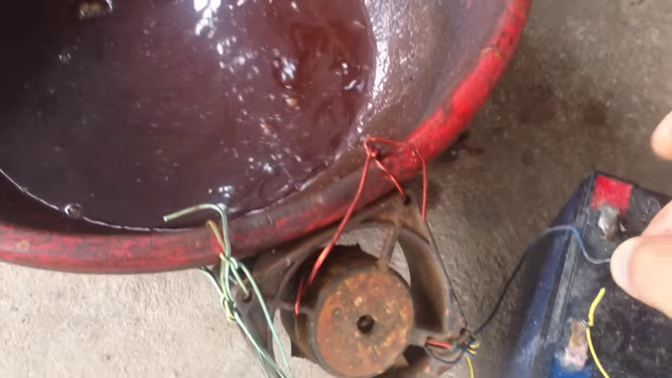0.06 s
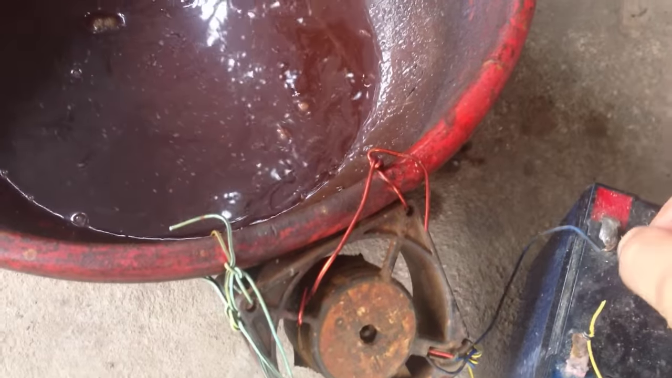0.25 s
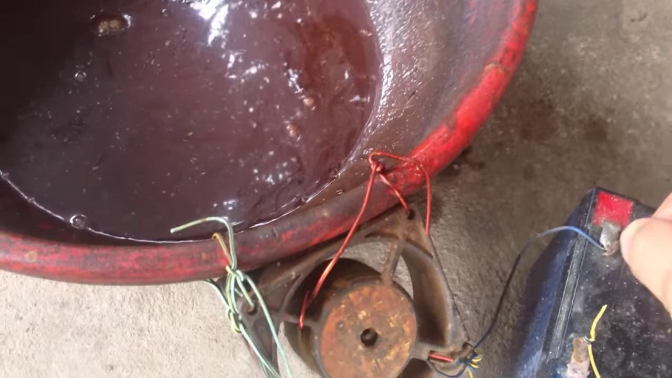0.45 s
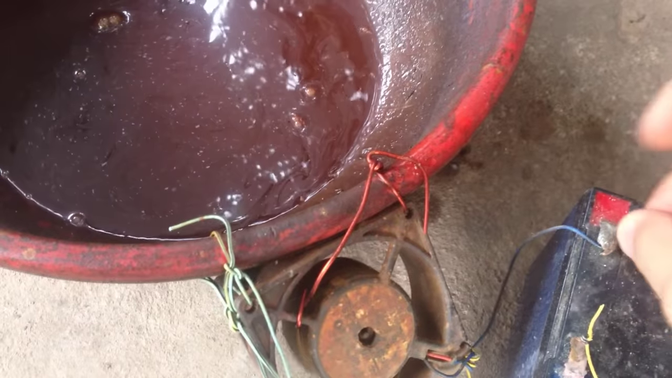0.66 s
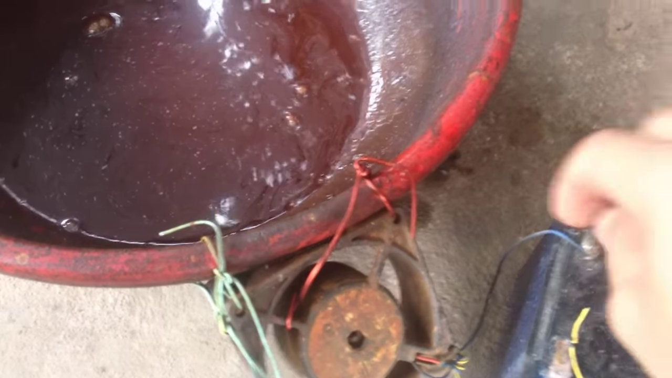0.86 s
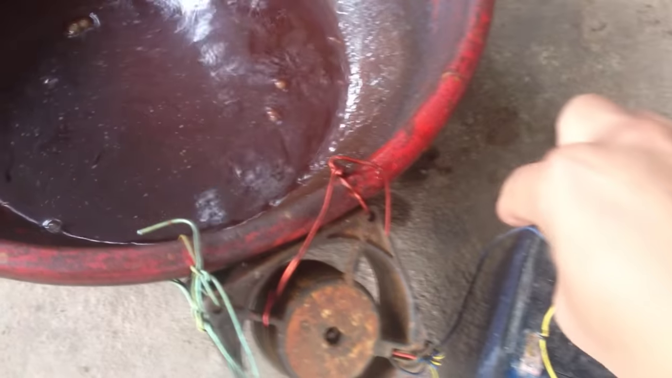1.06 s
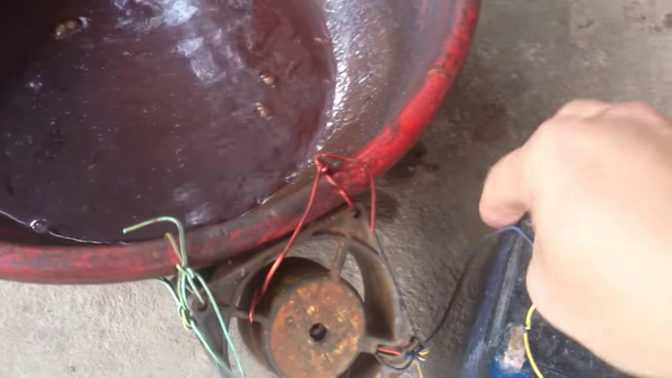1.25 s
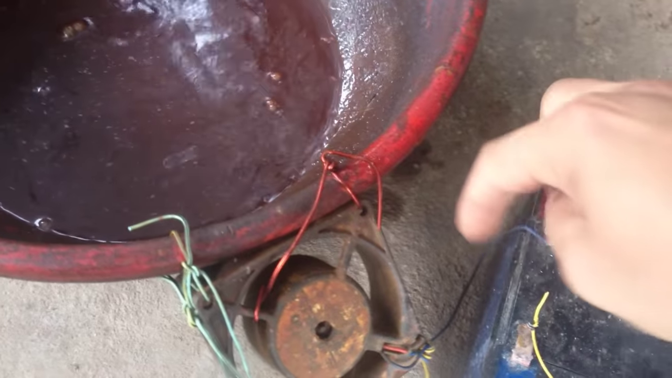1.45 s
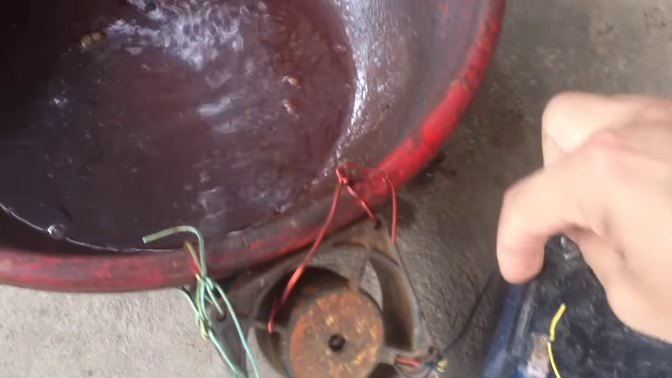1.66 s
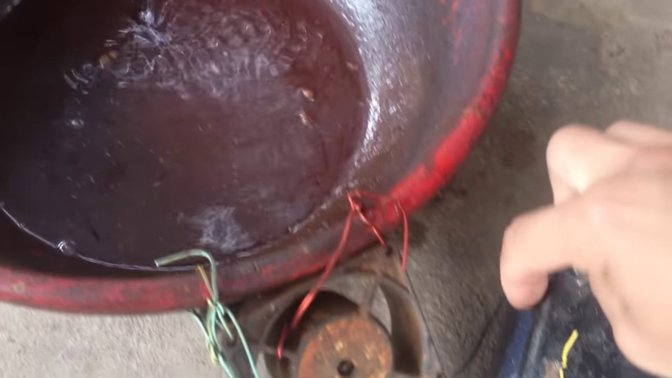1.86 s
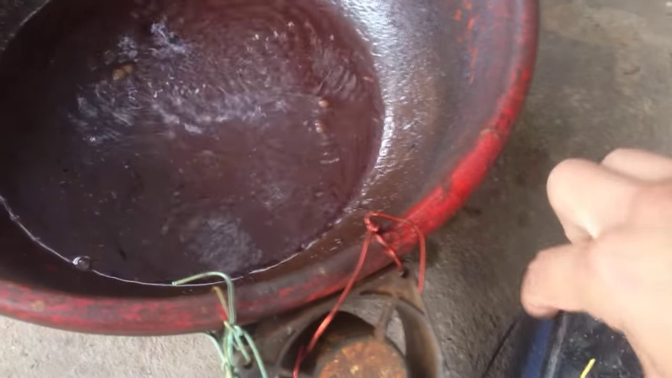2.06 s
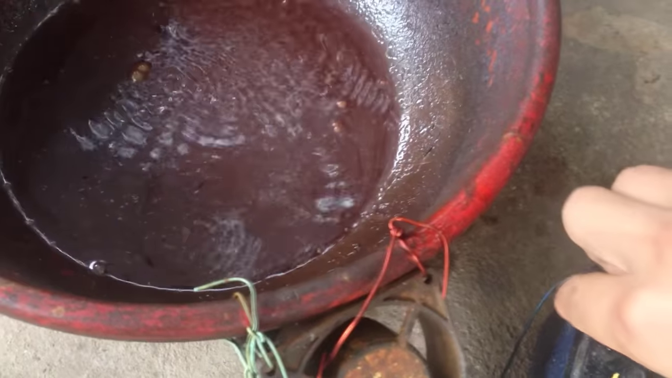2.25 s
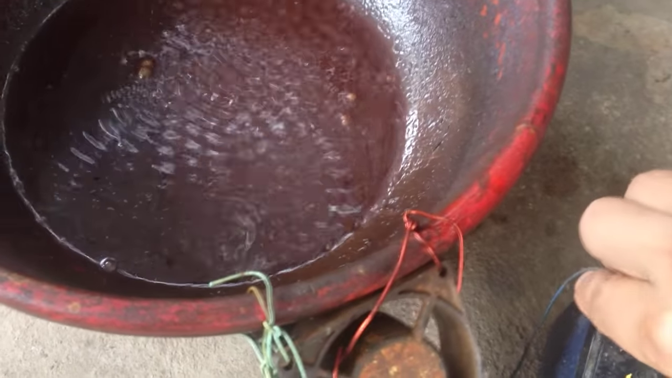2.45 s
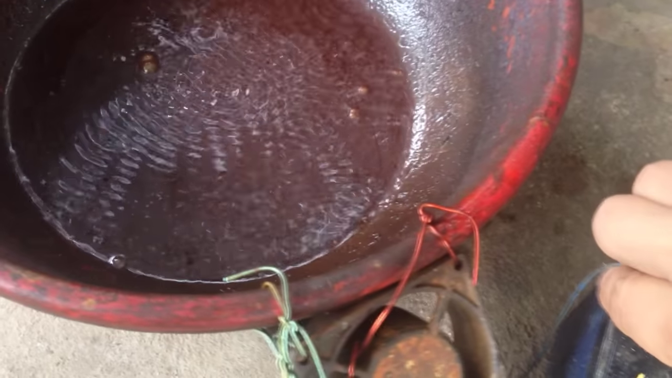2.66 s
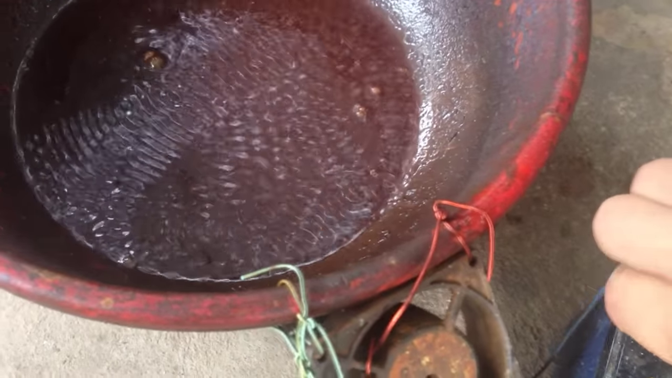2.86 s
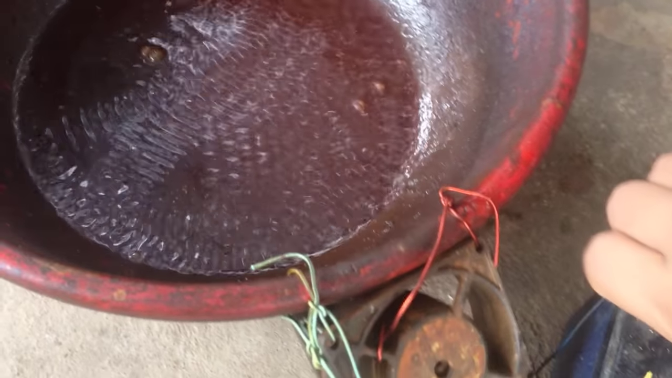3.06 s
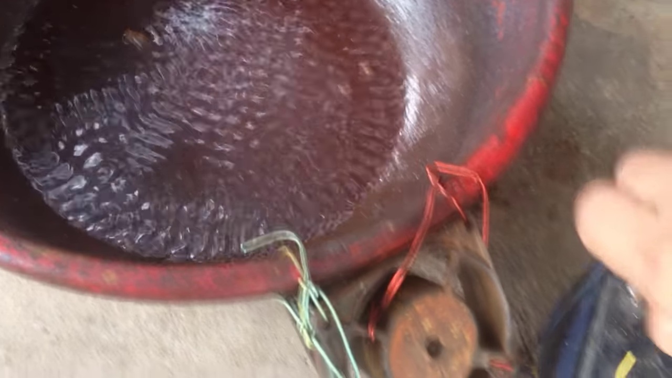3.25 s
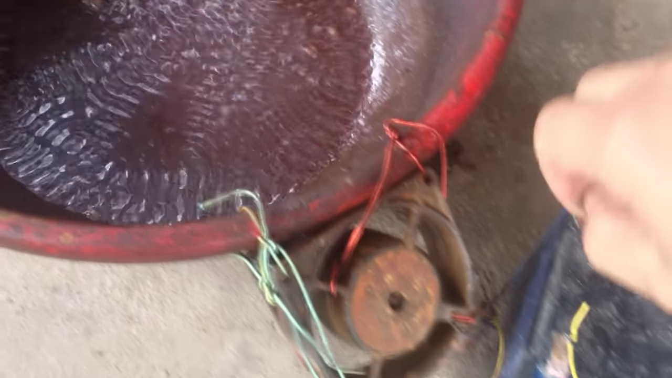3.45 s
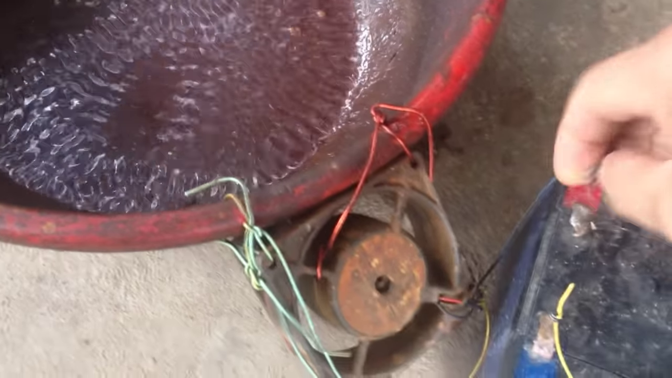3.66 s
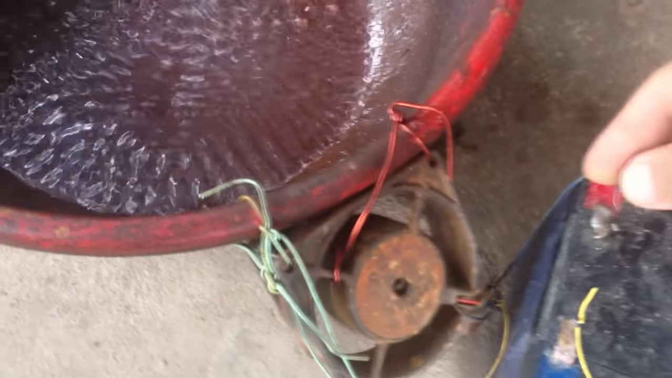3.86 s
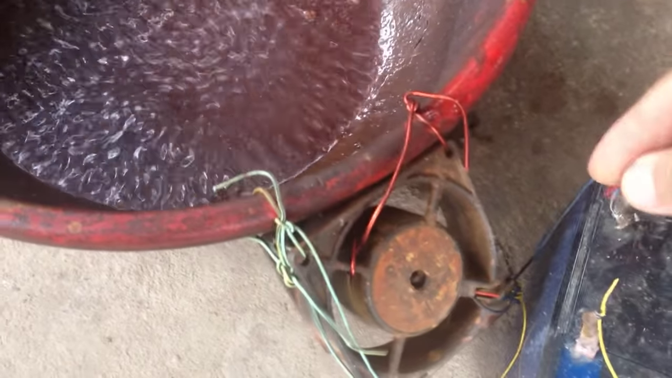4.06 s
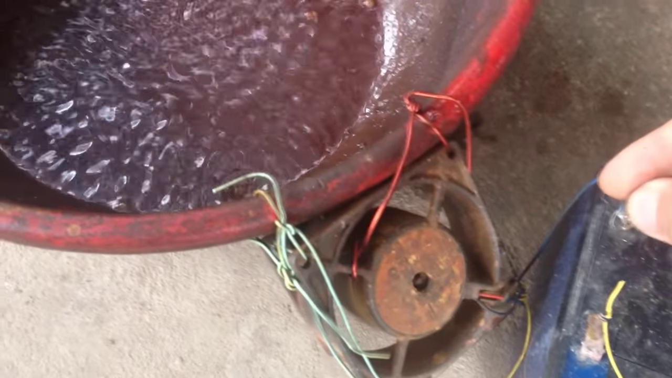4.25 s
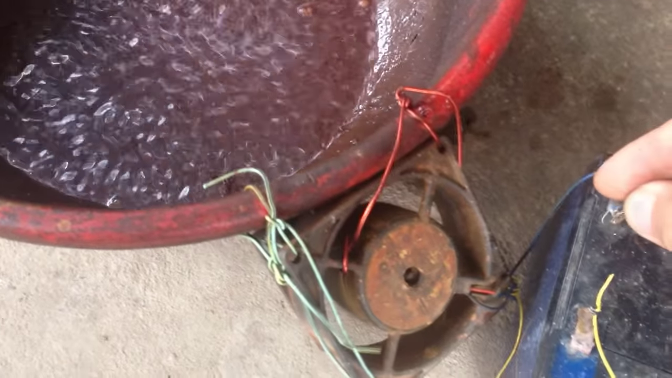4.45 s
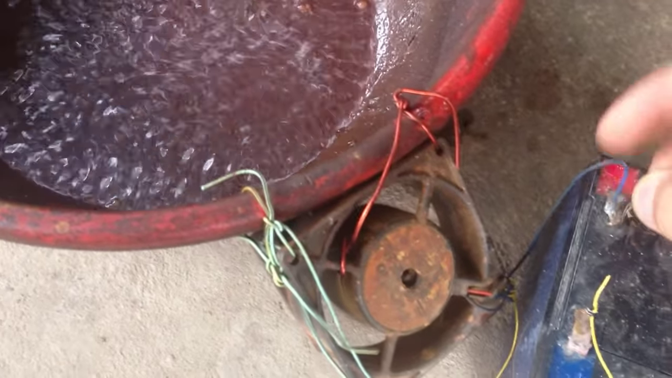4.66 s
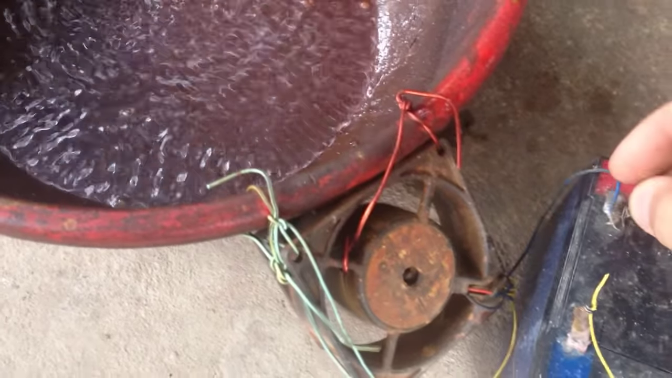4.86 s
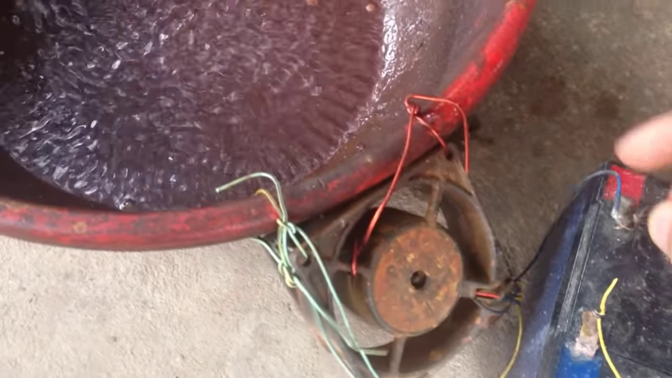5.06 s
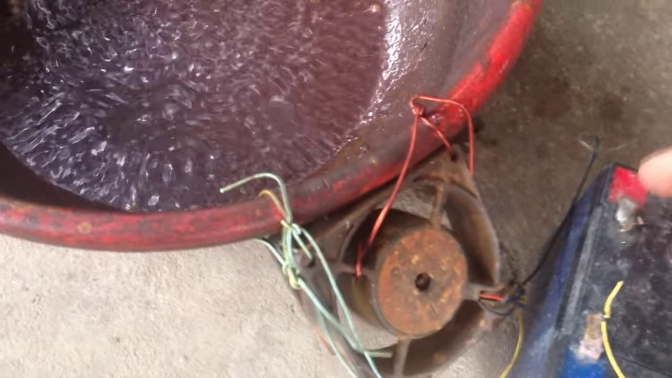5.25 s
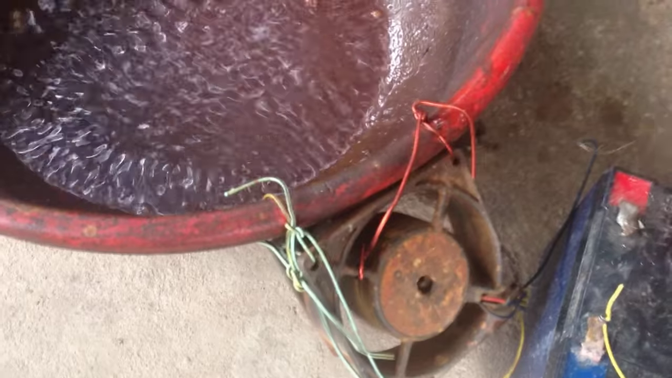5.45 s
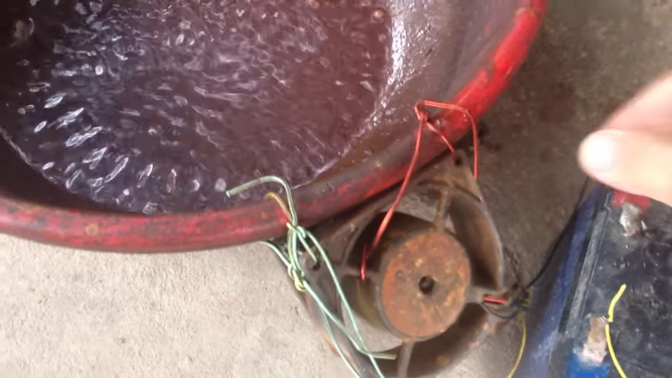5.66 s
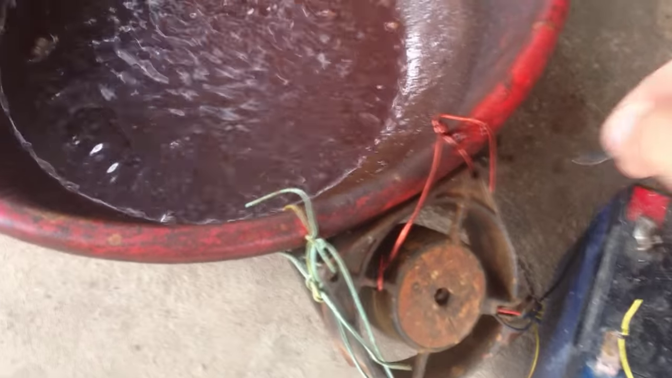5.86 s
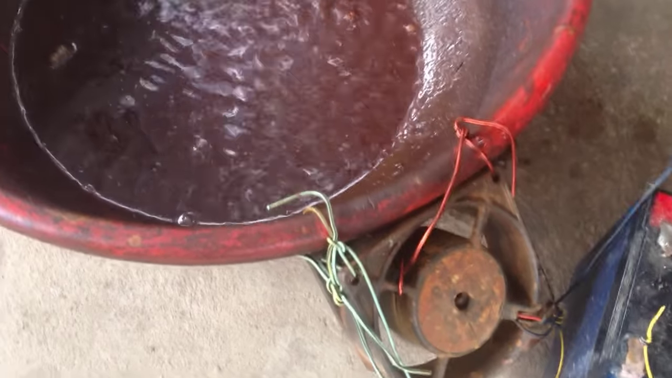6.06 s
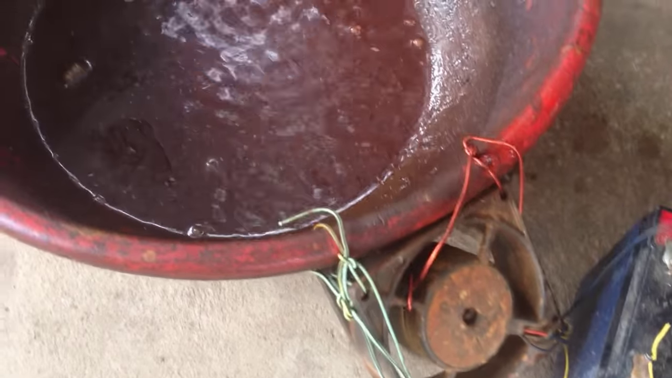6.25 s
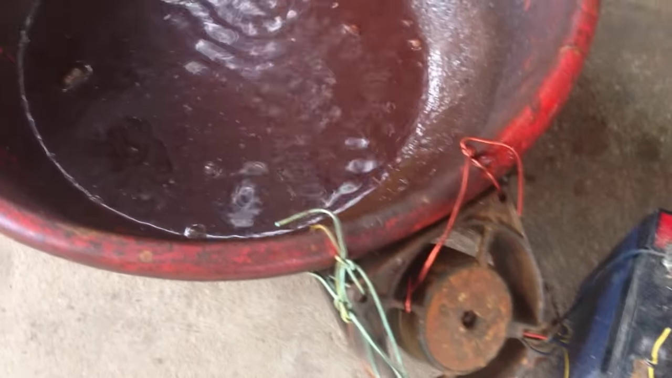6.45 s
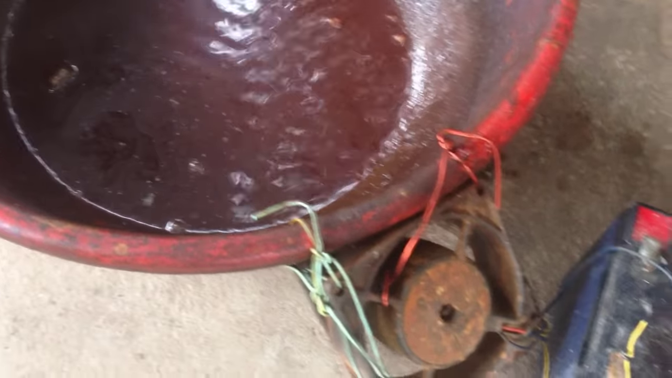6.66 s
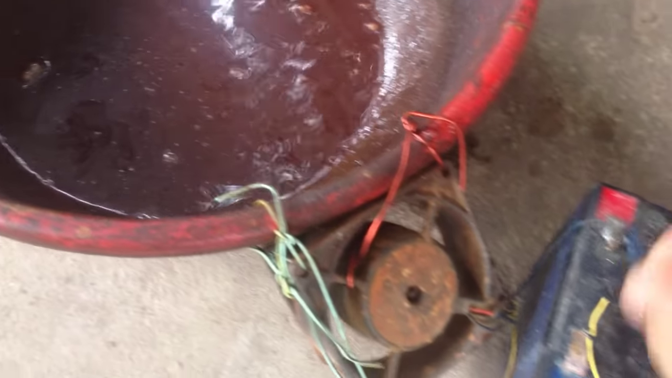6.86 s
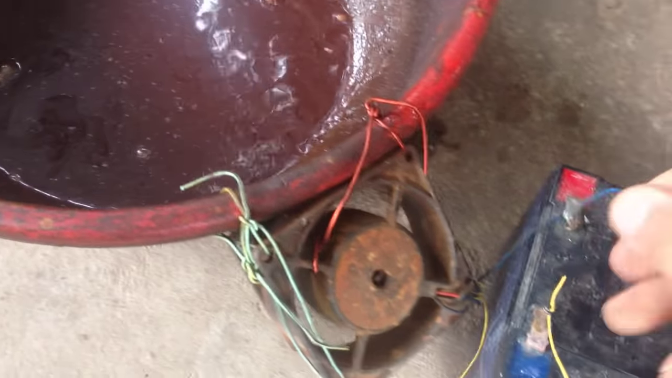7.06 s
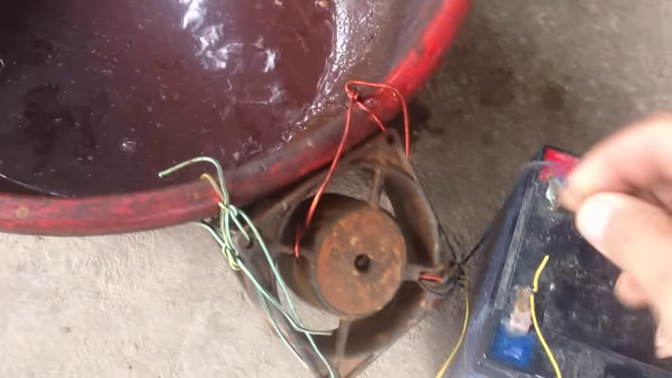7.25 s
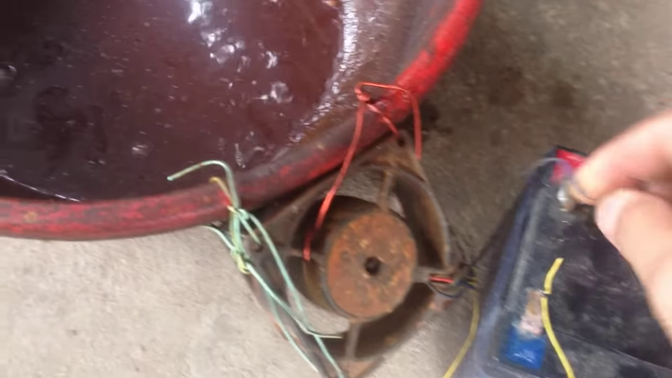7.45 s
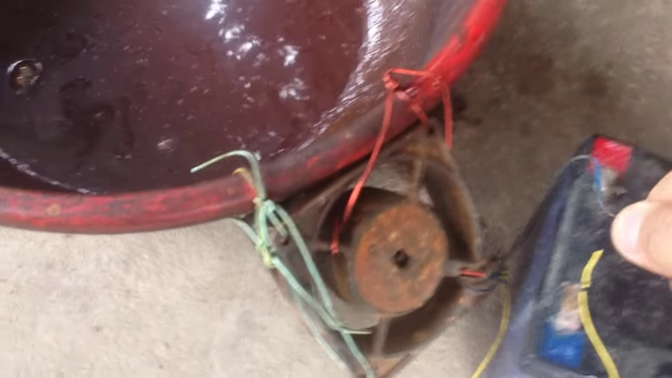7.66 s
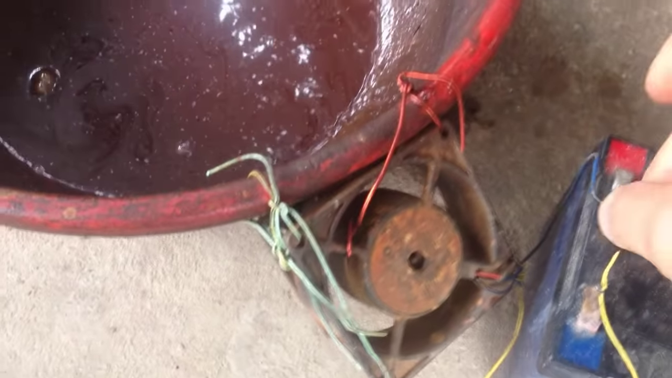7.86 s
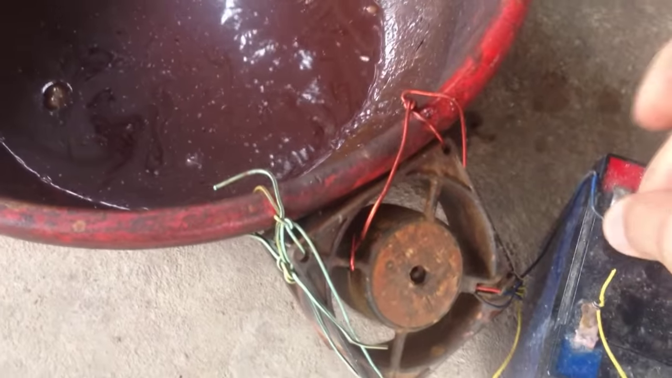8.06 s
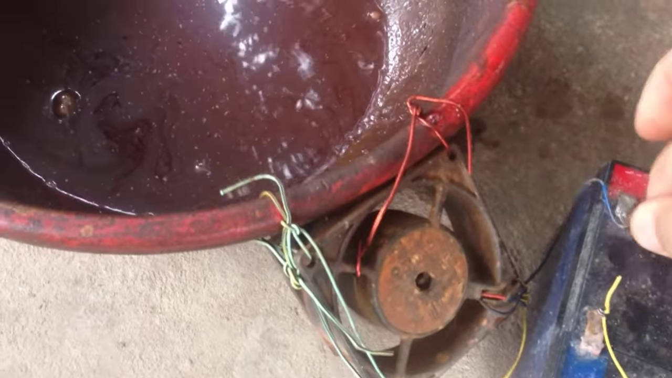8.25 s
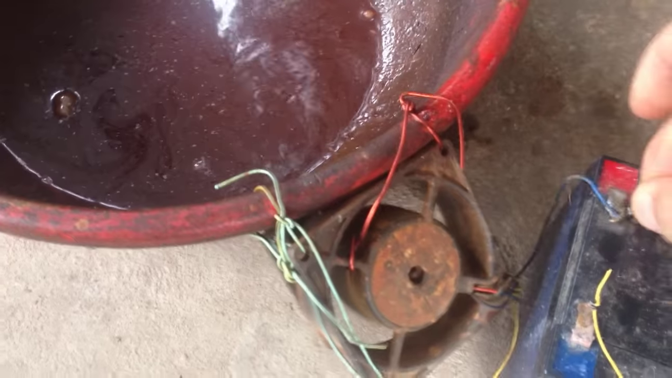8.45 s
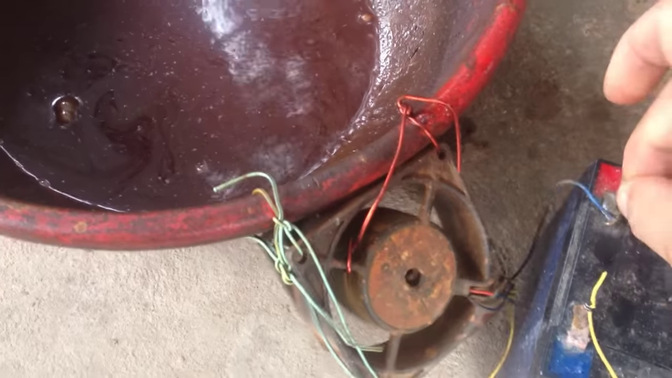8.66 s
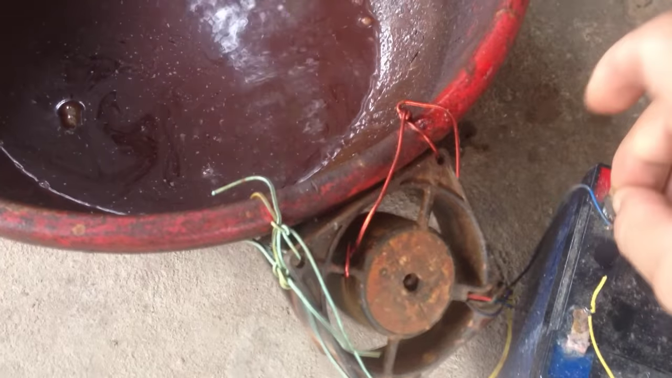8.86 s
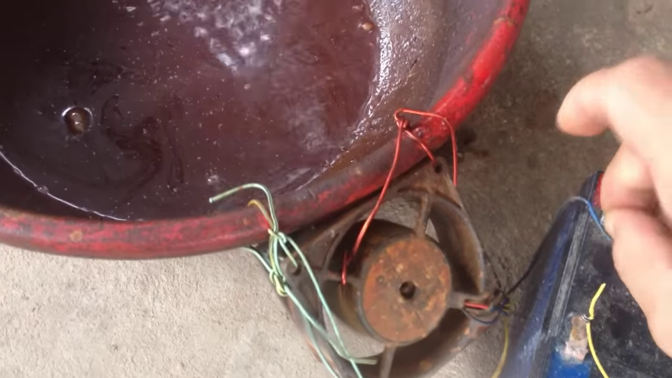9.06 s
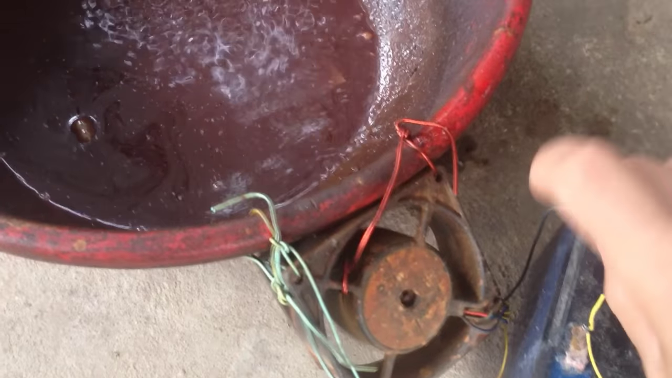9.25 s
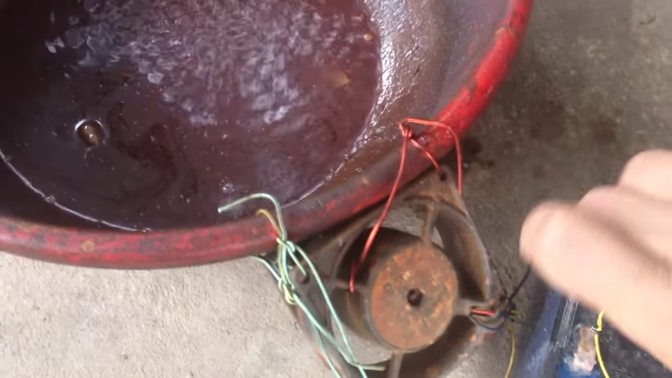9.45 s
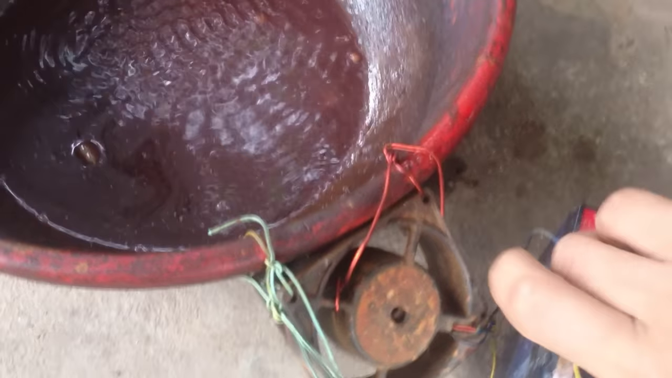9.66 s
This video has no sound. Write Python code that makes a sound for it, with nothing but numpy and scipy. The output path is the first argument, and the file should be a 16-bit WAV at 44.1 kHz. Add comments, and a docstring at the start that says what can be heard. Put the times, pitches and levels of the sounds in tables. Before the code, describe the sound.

Close and dry: scratchy bearings grind into motion, rising to a fast whirr with sizzling brush noise and sharp spark snaps. A hard, buzzy chatter joins while the motor shakes the basin, then cuts off abruptly. The whirr slows to a thinner rasp, with a soft knock and several small snaps, until renewed power brings back brighter hiss and speed. Faint steady air noise lies underneath.

```python
"""A small bare DC fan motor, wired to the rim of a basin of liquid, runs from a battery by a hand-held lead.
At 0.1 s the bearings catch and rasp through the housing, brushes hiss and spark, and the rotor thumps the basin.
From 1.7 to 5.5 s the frame rattles on the rim; the motor coasts from 3.1 s and is driven again from 3.9 to 4.8 s.
It then coasts down, with a soft knock at 6.3 s, and picks up again at 7.8 s; sharp spark snaps are spread throughout.
Ticks ring housing and frame modes, shaped noise makes hiss, thumps and air, and shaft orders make the hum."""
import sys
import numpy as np
from scipy import signal
from scipy.fft import rfft, irfft
from scipy.io import wavfile

SR = 44100
rng = np.random.default_rng(int(sys.argv[2]) if len(sys.argv) > 2 else 0)


def dump_mix(stems):
    """Bounce the given channels to the path in sys.argv[1] as a 16-bit WAV at rate SR."""
    frames = np.atleast_2d(stems).T  # one column per channel
    limited = np.clip(frames, -1, 1)  # hard clip at full scale
    pcm = np.round(limited * 32767).astype(np.int16)
    wavfile.write(sys.argv[1], SR, pcm)


N = 428211
TIME = np.arange(N) / SR
CRUISE_HZ = 40  # reference shaft speed for rasp and shaking


def amp(db):
    """Decibels to gain."""
    return 10 ** (np.asarray(db) / 20)


def unit(x):
    """Scale to rms 1."""
    return x / np.sqrt(np.mean(x ** 2) + 1e-20)


def wander(hz, size=16384):
    """Smooth random curve of rms 1: noise low-passed around hz."""
    step_s = TIME[-1] / size
    lowpass = 1 / (1 + (np.fft.rfftfreq(size, step_s) / hz) ** 2)
    slow = irfft(rfft(rng.standard_normal(size)) * lowpass, size)
    return np.interp(TIME, np.arange(size) * step_s, unit(slow))


def colour(x, points, size=4096):
    """Minimum-phase filter with the given spectrum; the result has rms 1."""
    points_hz, points_db = np.transpose(points)
    bins_hz = abs(np.fft.fftfreq(size, 1 / SR))
    bins_db = np.interp(np.log(bins_hz + 1), np.log(points_hz), points_db)
    log_gain = np.log(amp(bins_db))
    taps = np.fft.ifft(np.exp(np.conj(signal.hilbert(log_gain)))).real
    return unit(signal.oaconvolve(x, taps)[:N])


def ring(x, hz, width_hz):
    """Resonance with steep skirts (peak filter applied twice); the result has rms 1."""
    b, a = signal.iirpeak(hz, hz / width_hz, SR)
    floor = 1e-12 * (-1) ** (np.arange(N) & 1)
    return unit(signal.sosfilt([[*b, *a], [*b, *a]], x + floor))


def impacts(per_s, spread_db):
    """Random small blows of uneven size."""
    struck = rng.random(N) < per_s / SR
    return struck * amp(spread_db * np.minimum(rng.exponential(1, N), 4))


def anywhere(blows):
    """Each blow lands at another spot, so it pushes a mode with a random sign."""
    return blows * rng.choice([-1., 1.], N)


def scatter(ticks, wet, decay_s):
    """Basin wall, battery and ground smear each tick into a puff of noise."""
    keep = np.exp(-2 / (decay_s * SR))
    tail = np.sqrt(signal.lfilter([1 - keep], [1, -keep], ticks ** 2 + 1e-20))
    return (ticks + wet * tail * rng.standard_normal(N)) / np.hypot(1, wet)


def knee(shaft_hz, knee_hz, steepness):
    """Level in dB that climbs with speed and flattens at 0 above the knee."""
    return -10 * np.log10(1 + (knee_hz / (shaft_hz + .01)) ** steepness)


def swell(centre_s, half_s):
    """Smooth rise to 1 and fall around a moment."""
    return np.exp(-((TIME - centre_s) / half_s) ** 2)


# lead touching the battery: on_s, off_s, spin_up_s (longer with a poor contact)
CONTACTS = [(.1, 3.056, .603), (3.912, 4.812, .759), (7.79, 9.71, .529)]
FREE_HZ, COAST_S = 51.75, 2.752  # speed the motor strives for; coasting time constant


def shaft():
    """Turns per second: each contact pulls the rotor towards its free speed, then it coasts."""
    shaft_hz = np.zeros(N)
    for on_s, off_s, spin_up_s in CONTACTS:
        gap_hz = FREE_HZ - shaft_hz[round(on_s * SR)]
        driven_s = np.clip(TIME - on_s, 0, off_s - on_s)
        driven_hz = FREE_HZ - gap_hz / (1 + gap_hz / FREE_HZ * driven_s / spin_up_s)
        coasting = np.exp(-np.maximum(TIME - off_s, 0) / COAST_S)
        shaft_hz = np.where(TIME < on_s, shaft_hz, driven_hz * coasting)
    return shaft_hz


def current(shaft_hz):
    """Share 0-1 of the stall current: flows while the lead touches and falls as the rotor speeds up."""
    touching = sum((TIME >= on_s) * (TIME < off_s) for on_s, off_s, _ in CONTACTS)
    return touching * (1 - shaft_hz / FREE_HZ)


def pressure(turns, depth_db, chatter_db, drift_db):
    """Contact force: swings with each turn of the rotor and chatters at random."""
    swing_db = depth_db * np.cos(2 * np.pi * (turns - .15))
    return amp(swing_db + chatter_db * wander(240) + drift_db * wander(48))


LOOSE_S, SETTLED_S, LOOSE_ATTACK_S, LOOSE_RELEASE_S = 1.69, 5.53, 0.022, 0.031


def looseness():
    """1 while the frame chatters on the rim, 0 while it rests against it, at set times."""
    breaking_loose = np.clip((TIME - LOOSE_S) / LOOSE_ATTACK_S, 0, 1)
    return breaking_loose * np.clip(1 - (TIME - SETTLED_S) / LOOSE_RELEASE_S, 0, 1)


# loose frame rocks harder: centre_s, half_s, rise_db
SURGES = [(2.11, 0.5, 4), (4.813, .28, 2.9)]


def surge_level():
    """Rise in dB as the loose frame rocks harder."""
    return sum(rise_db * swell(centre_s, half_s) for centre_s, half_s, rise_db in SURGES)


# still air spectrum: freq_hz, density_db (dB per Hz, relative)
AIR = [(25, -26), (55, -6), (78, 8.5), (120, -5), (400, -3), (1200, -8), (3000, -13.5), (10500, -12),
       (13000, -9)]


def still_air(level_db=-65.5):
    """Steady shaped noise of the still air."""
    return amp(level_db) * colour(rng.standard_normal(N), AIR)


# hanging motor sways on its wires: centre_s, half_s, drive_db
SWAYS = [(1.06, .2, -48), (5.6, 0.27, -59), (8.4, 0.33, -56.5)]
# soft knock on the basin: centre_s, half_s, drive_db
KNOCK = (6.29, .04, -54)
CRAWL_SHAKE_DB, CRUISE_SHAKE_DB, SHAKE_STEEPNESS = -71.5, -52, 7.6
LOOSE_SHAKE_DB, SURGE_GAIN = -49, 2  # shaking rises 2 dB per dB of surge


def shake_gain(shaft_hz, loose, surge_db):
    """How hard the basin shakes: rotor, loose frame, sways and the knock add in power."""
    rotor = amp(CRUISE_SHAKE_DB) * (shaft_hz / CRUISE_HZ) ** SHAKE_STEEPNESS
    rotor = rotor + amp(CRAWL_SHAKE_DB) * (shaft_hz > 0)
    frame = amp(LOOSE_SHAKE_DB + SURGE_GAIN * surge_db) * loose
    swell_power = sum((amp(db) * swell(centre_s, half_s)) ** 2 for centre_s, half_s, db in SWAYS + [KNOCK])
    return np.sqrt(rotor ** 2 + frame ** 2 + swell_power)


# hum of the unbalanced rotor: order (multiple of shaft speed), level_db (relative)
ORDERS = [(1, -20), (2, -8), (3, -1.5), (4, -.5), (5, -3), (6, -7.5), (7, -10)]
# basin's answer to a thump: freq_hz, density_db (dB per Hz, relative)
BASIN = [(20, -31), (45, -14), (80, -5), (130, 0.5), (180, 0.5), (240, -5), (350, -3), (480, -18),
         (800, -23.5)]


def basin(shaft_hz, turns, hum_db=-2.5, thump_db=-7, swing_db=6, waver_db=2.4, takeoff_hz=21):
    """The unbalanced rotor drives the basin: a hum on the shaft orders and a dull thump each turn."""
    hum = unit(sum(amp(level_db + waver_db * wander(8.1)) * np.cos(2 * np.pi * order * turns)
                   for order, level_db in ORDERS))
    unbalance = shaft_hz ** 4 / (shaft_hz ** 4 + takeoff_hz ** 4)  # a slow rotor hardly hums
    blows = anywhere(impacts(900, spread_db=3.0)) * amp(swing_db * np.cos(2 * np.pi * turns))
    return amp(hum_db) * unbalance * hum + amp(thump_db) * colour(blows, BASIN)


# frame and rim modes: freq_hz, width_hz, level_db (relative)
FRAME = [(229, 92, -14), (376, 156, -9), (710, 260, -20.5), (891, 131, -1), (1250, 440, -18),
         (1622, 200, -6), (1733, 84, -5.5), (1875, 230, -5.5), (2650, 450, -27.5), (2864, 130, -24)]
RATTLE_DB = -39.5


def rattle(turns, force, swing_db=3, rock_db=1.0):
    """The frame rocks on its wires and chatters on the rim, hardest as the rotor swings against it."""
    rocking = amp(swing_db * np.cos(2 * np.pi * turns) + rock_db * wander(6.0))
    blows = impacts(1000, spread_db=1.5) * force ** 0.18 * rocking
    return sum(amp(level_db) * ring(anywhere(blows), hz, width_hz) for hz, width_hz, level_db in FRAME)


# loud spark snaps: start_s, level_db (peak, before the common boost and smearing), pitch_hz
SNAPS = [(0.8185, -28, 14900), (1.456, -18, 13900), (1.8502, -23, 14900), (2.3271, -24, 14700),
         (2.4994, -20.5, 14600), (3.3598, -23, 8140), (4.9696, -23, 14900), (5.2385, -22.5, 15100),
         (5.2849, -23, 15000), (6.5505, -32, 11100), (6.6079, -30, 13900), (6.6598, -31, 15200),
         (6.9446, -31, 14000), (7.9334, -36, 15000), (9.5472, -21, 15000)]


def snaps(decay_s=0.0013, crack=0.71, boost_db=3):
    """Single larger sparks: a short crack with a bright ring."""
    out, t = np.zeros(N), np.arange(900) / SR
    for start_s, level_db, pitch_hz in SNAPS:
        tone = np.sin(2 * np.pi * pitch_hz * t)
        snap = (tone + crack * rng.standard_normal(len(t))) * t * np.exp(-2 * t / decay_s)
        part = out[round(start_s * SR):][:len(t)]
        part += (amp(level_db + boost_db) * snap / abs(snap).max())[:len(part)]
    highpass = signal.butter(2, 6000, "high", fs=SR, output="sos")
    return signal.sosfilt(highpass, scatter(out, wet=1.0, decay_s=0.0087))


SPARK_DRAW_DB, SPARK_KNEE_HZ, SPARK_STEEPNESS = 7, 11.4, 6.5
COLD_SPARK_DB, WARM_UP_S = -21, 0.55


def spark_level(shaft_hz):
    """Sparking in dB re brush friction: grows with current, dies at low speed, weak on cold brushes."""
    cold_db = COLD_SPARK_DB * np.exp(-(TIME / WARM_UP_S) ** 2)
    return SPARK_DRAW_DB * current(shaft_hz) + knee(shaft_hz, SPARK_KNEE_HZ, SPARK_STEEPNESS) + cold_db


BRUSH_DB, BRUSH_KNEE_HZ, BRUSH_STEEPNESS, CURRENT_DB = -44.5, 29.5, 4.66, 3


def friction_level(shaft_hz):
    """Brush friction in dB: grows with speed up to a knee, harder while current flows."""
    return BRUSH_DB + knee(shaft_hz, BRUSH_KNEE_HZ, BRUSH_STEEPNESS) + CURRENT_DB * current(shaft_hz)


# brush hiss spectrum: freq_hz, density_db (dB per Hz, relative)
HISS = [(3200, -14), (4000, -8), (4900, -22), (5200, -5.5), (5500, -3.5), (6550, 1), (7800, -1),
        (8500, 0.5), (9800, -1), (11100, 0.5), (12200, -5.5), (13400, 0), (15200, -7), (16000, -1)]
# modes rung by sparks: freq_hz, width_hz, level_db (relative)
SPARK_MODES = [(8640, 1200, -10.5), (11040, 1150, -13.5), (13730, 2400, -8.5), (14900, 800, -5.5)]


def brushes(shaft_hz, force, hiss_db=0.1, flare_db=3.5, spark_spread_db=5, arc_share=0.21):
    """Brushes scrape the commutator with a grainy hiss and spit tiny sparks, each with its own ring."""
    grains = anywhere(impacts(700 + 5.1 * shaft_hz ** 2, spread_db=4.5)) * force
    scrape = colour(scatter(grains, wet=0.8, decay_s=0.0028), HISS)
    flare = force ** 1.05 * amp(flare_db * wander(22))  # sparks come in short showers
    sparks = np.zeros(N)
    for hz, width_hz, level_db in SPARK_MODES:
        ticks = anywhere(impacts(120 + 25 * shaft_hz, spark_spread_db)) * flare
        sparks += amp(level_db) * ring(scatter(ticks, wet=0.66, decay_s=0.0014), hz, width_hz)
    sparking_db = spark_level(shaft_hz)
    return amp(hiss_db + arc_share * sparking_db) * scrape + amp(sparking_db) * sparks


RASP_DB, RASP_KNEE_HZ, RASP_EASE_DB_PER_HZ = -34.0, 4.5, 0.0861  # smoother when fast
DRY_DB, RUN_IN_S = 4.5, 2.5  # louder until run in
BREAKAWAY_DB, BREAKAWAY_S = -13, 0.099  # swells as the shaft breaks free
TORQUE_DB, LOOSE_RASP_DB = 0.3, -3  # torque loads the shaft


def rasp_level(shaft_hz, loose, start_steepness=1.8, run_in_steepness=6):
    """Bearing rasp in dB; a loose frame passes less of it on."""
    running_db = knee(shaft_hz, RASP_KNEE_HZ, start_steepness) + RASP_EASE_DB_PER_HZ * (CRUISE_HZ - shaft_hz)
    sticking_db = BREAKAWAY_DB * np.exp(-np.maximum(TIME - CONTACTS[0][0], 0) / BREAKAWAY_S)
    dry_db = DRY_DB / (1 + (TIME / RUN_IN_S) ** run_in_steepness)
    load_db = TORQUE_DB * current(shaft_hz) + LOOSE_RASP_DB * loose
    return RASP_DB + running_db + sticking_db + dry_db + load_db


# bearing catches as the shaft starts: start_s, level_db (re an ordinary tick)
CATCHES = [(0.138, 17), (0.152, 16), (0.17, 21), (0.229, 16)]
# housing modes: freq_hz, width_hz, level_db (relative), friction_share (0-1, follows brush friction)
HOUSING = [(250, 207, -22, 0.29), (395, 147, -18, 0.36), (507.2, 60, -12.5, 0.28), (588, 146, -11, 0.46),
           (754.4, 119, -3.5, 0.37), (793, 91, -14, 0), (903, 107, -7, 0.21), (1148, 64, -26, 0.36),
           (1300, 340, -19, 0.44), (1753, 190, -14, 0.46), (1929, 167, -10.5, 0.66), (2133, 147, -15, 0.75),
           (2480, 500, -26, 0.57), (3785, 720, -21.5, 0.72), (4210, 385, -8, 0.99), (4524, 620, -16, 0.61)]


def bearings(shaft_hz, force, rasp_db, friction_db, full_brush_db=-42.0, full_rasp_db=-35, spread_db=0.9):
    """Dry bearings tick densely into the housing; hard friction brings out its upper modes."""
    blows = impacts(700 + 45 * shaft_hz, spread_db)
    blows = blows * amp(0.97 * wander(1.65))  # the shaft drifts in its play
    for start_s, level_db in CATCHES:
        blows[round(start_s * SR)] = amp(level_db)
    brush_db = friction_db - full_brush_db + full_rasp_db
    soft, hard = blows * force ** 0.047, blows * force  # firm contact reaches the high modes most
    rasp = np.zeros(N)
    for hz, width_hz, level_db, friction_share in HOUSING:
        mode_db = level_db + rasp_db + friction_share * (brush_db - rasp_db)
        rasp += amp(mode_db) * ring(anywhere(soft if hz < 1500 else hard), hz, width_hz)
    return rasp


def scene():
    """One shaft drives the motor layers, over still air."""
    shaft_hz, loose, surge_db = shaft(), looseness(), surge_level()
    turns = np.cumsum(shaft_hz) / SR
    force = pressure(turns, depth_db=-0.3, chatter_db=1.63, drift_db=1.43)
    friction_db = friction_level(shaft_hz)
    shaking = shake_gain(shaft_hz, loose, surge_db) * basin(shaft_hz, turns)
    chatter = amp(RATTLE_DB + surge_db) * loose * rattle(turns, force)
    brushing = amp(friction_db) * brushes(shaft_hz, force)
    rasp = bearings(shaft_hz, force, rasp_level(shaft_hz, loose), friction_db)
    return (still_air() + shaking + chatter + snaps() + brushing + rasp)[None]


DIP_HZ, DIP_WIDTH_HZ, DIP_DEPTH = 5150, 130, 0.54  # depth 0-1
EDGE_HZ = 15350


def record(dry):
    """The microphone's narrow dip, then the recorder's band limit."""
    notched = signal.lfilter(*signal.iirnotch(DIP_HZ, DIP_HZ / DIP_WIDTH_HZ, SR), dry)
    heard = dry + DIP_DEPTH * (notched - dry)
    lowpass = signal.firwin(401, EDGE_HZ, window=("kaiser", 8), fs=SR)
    return signal.oaconvolve(heard, lowpass[None], "same")


dry = scene()
out = record(dry)
dump_mix(out)
```